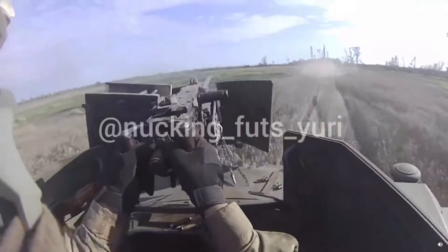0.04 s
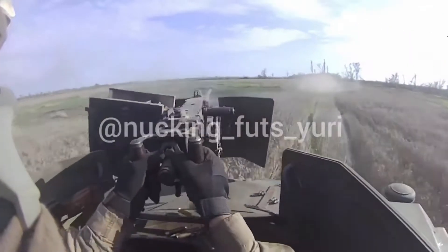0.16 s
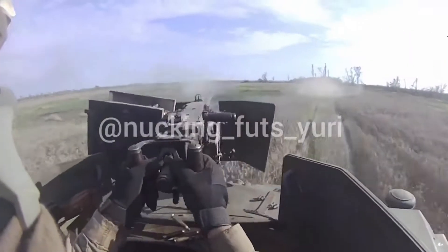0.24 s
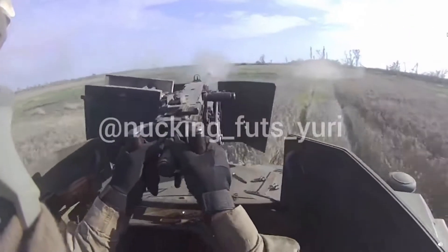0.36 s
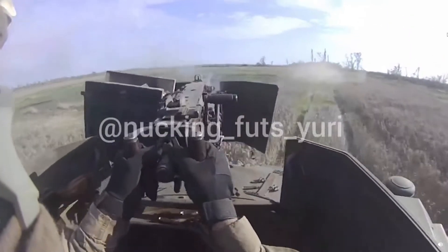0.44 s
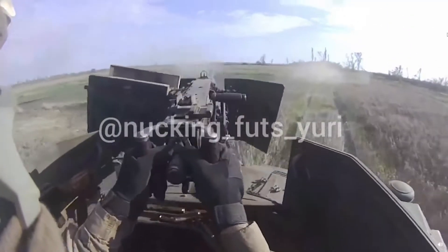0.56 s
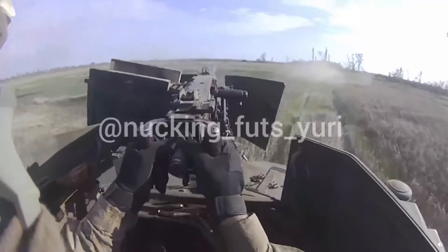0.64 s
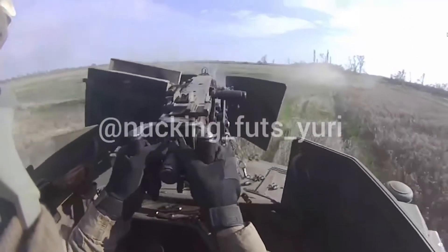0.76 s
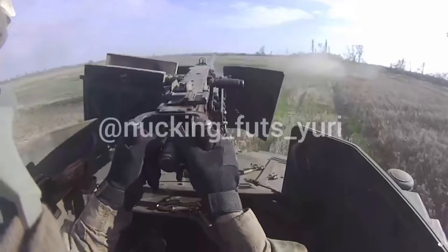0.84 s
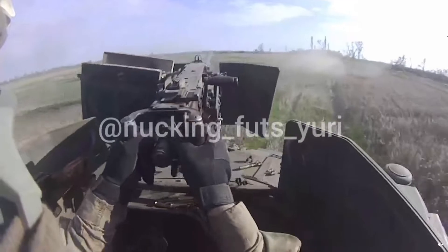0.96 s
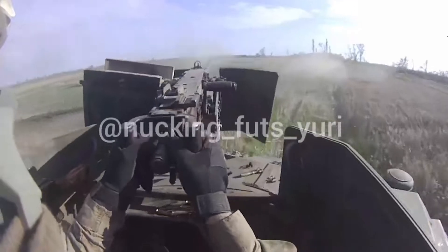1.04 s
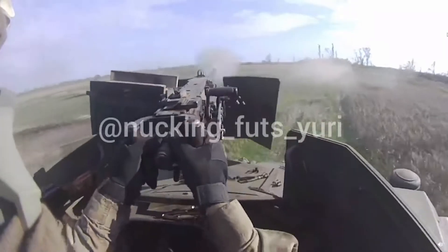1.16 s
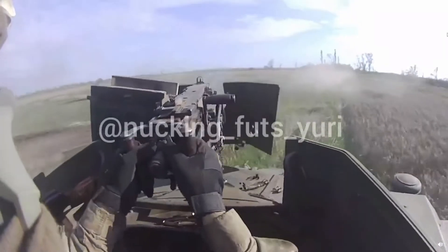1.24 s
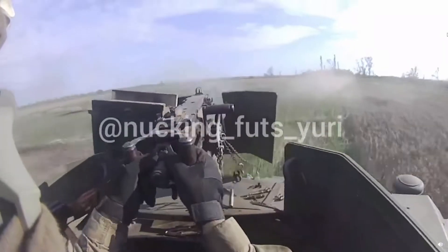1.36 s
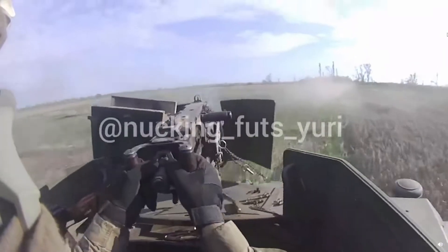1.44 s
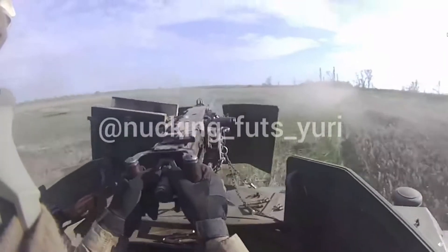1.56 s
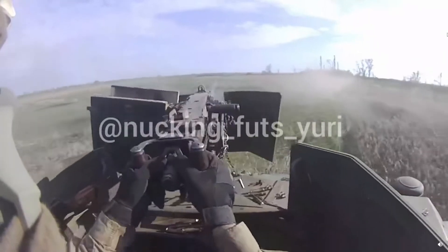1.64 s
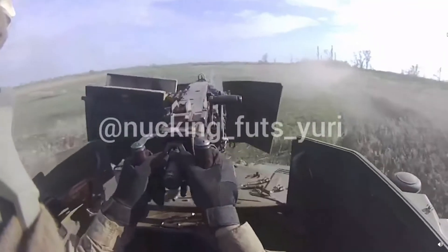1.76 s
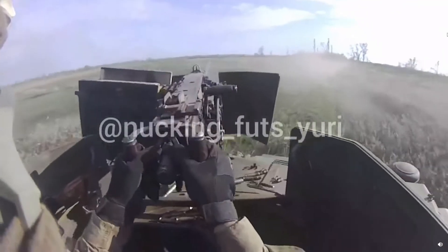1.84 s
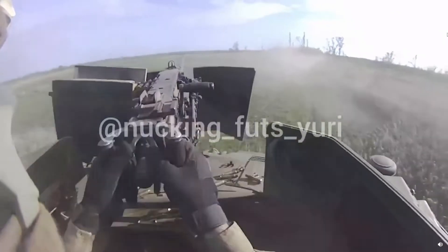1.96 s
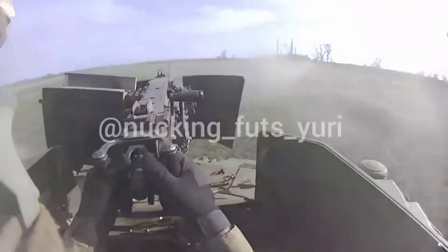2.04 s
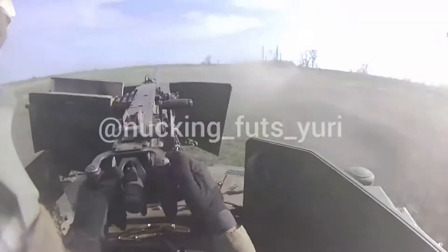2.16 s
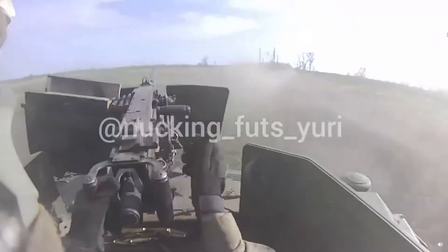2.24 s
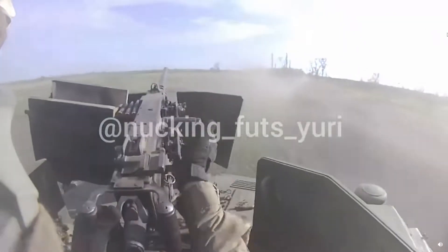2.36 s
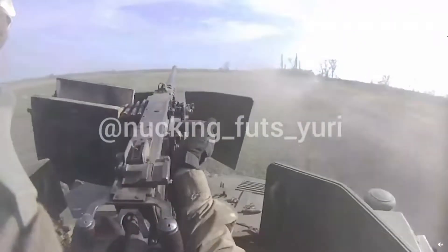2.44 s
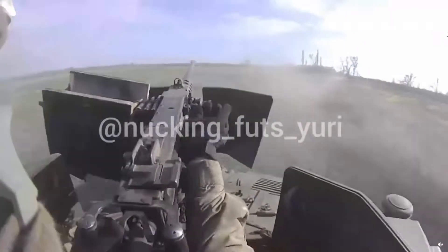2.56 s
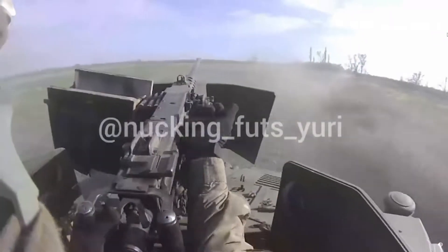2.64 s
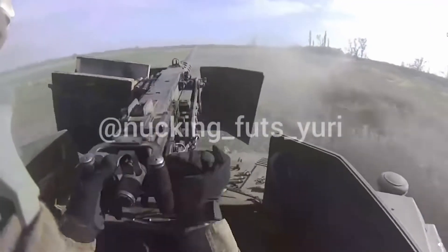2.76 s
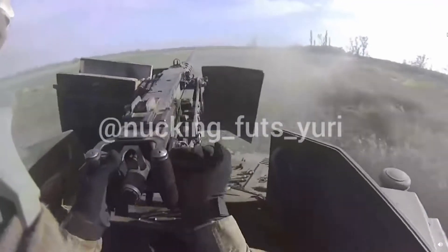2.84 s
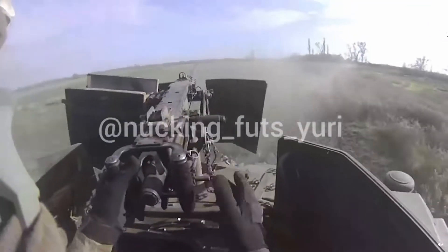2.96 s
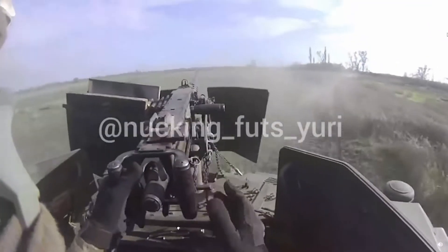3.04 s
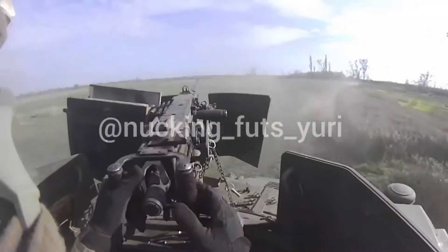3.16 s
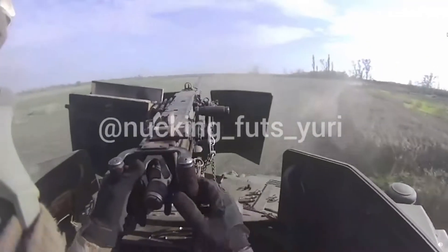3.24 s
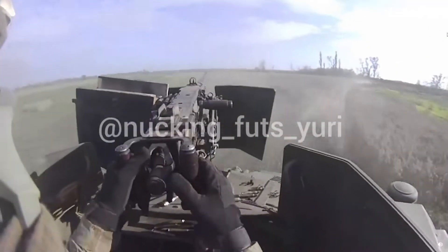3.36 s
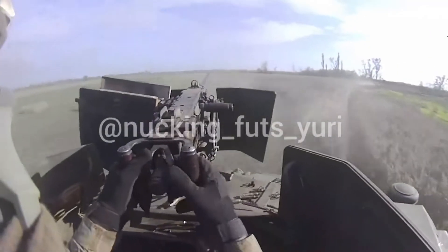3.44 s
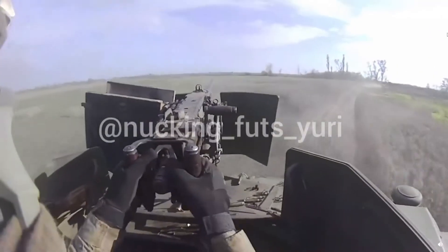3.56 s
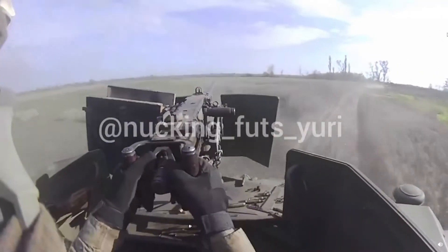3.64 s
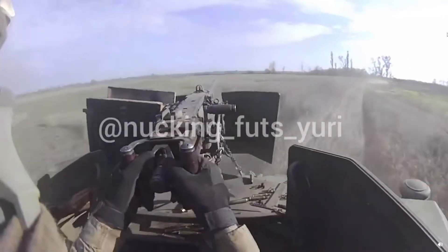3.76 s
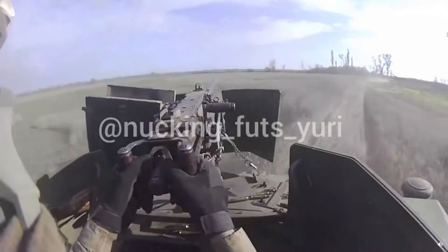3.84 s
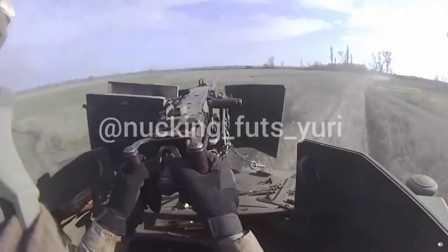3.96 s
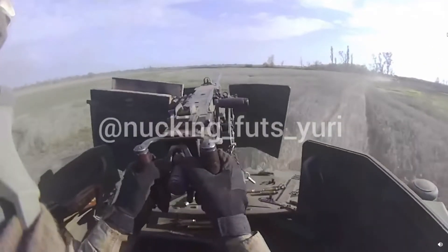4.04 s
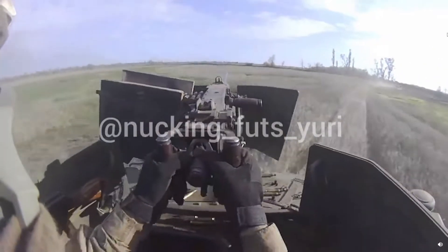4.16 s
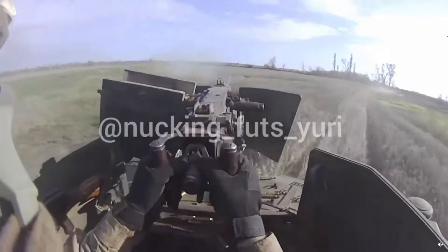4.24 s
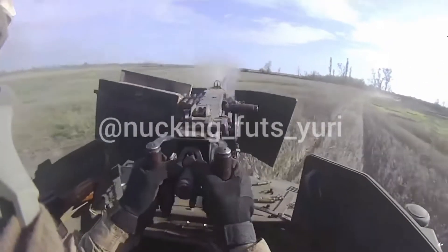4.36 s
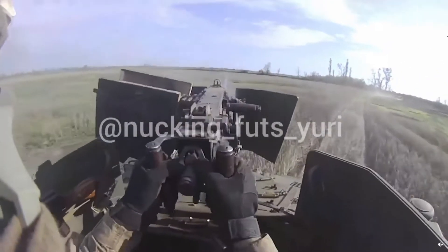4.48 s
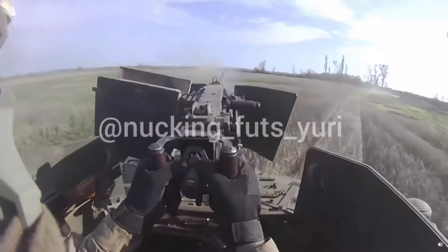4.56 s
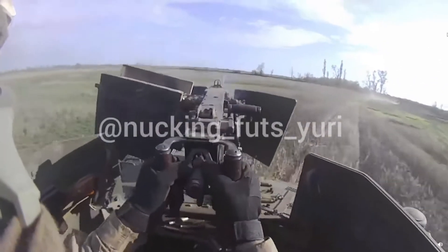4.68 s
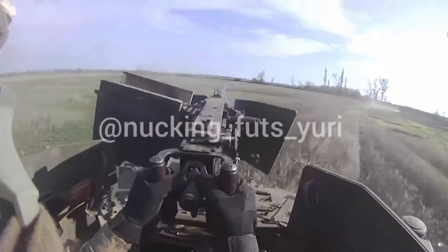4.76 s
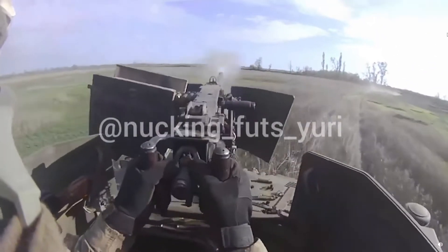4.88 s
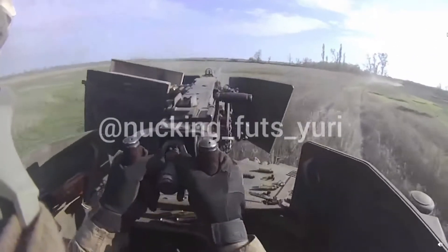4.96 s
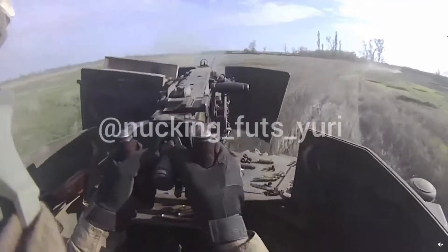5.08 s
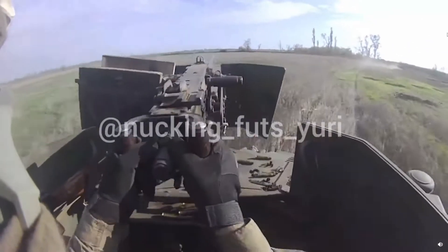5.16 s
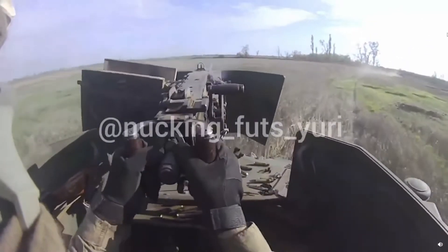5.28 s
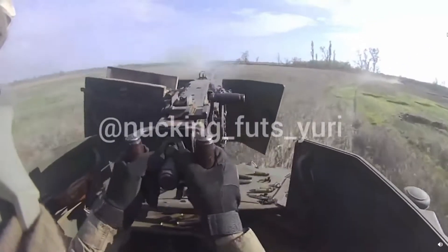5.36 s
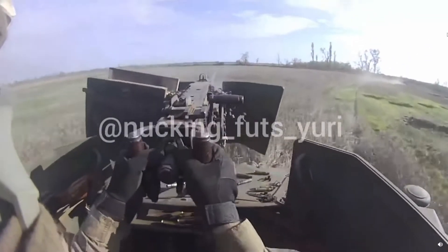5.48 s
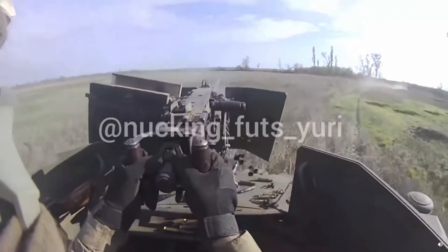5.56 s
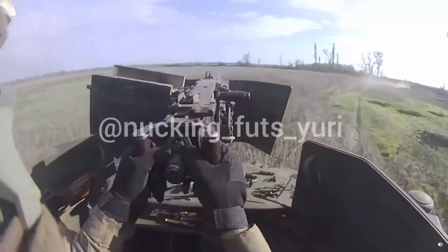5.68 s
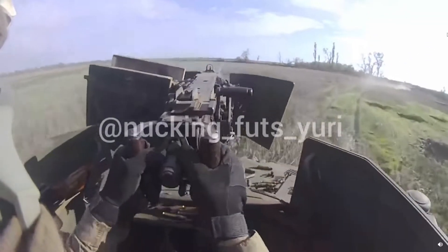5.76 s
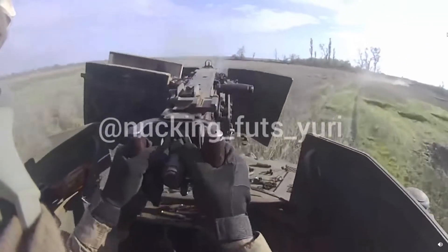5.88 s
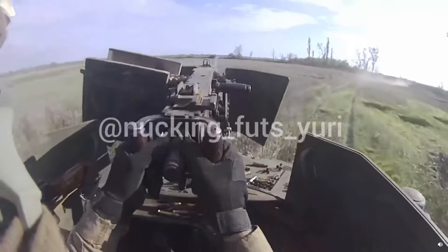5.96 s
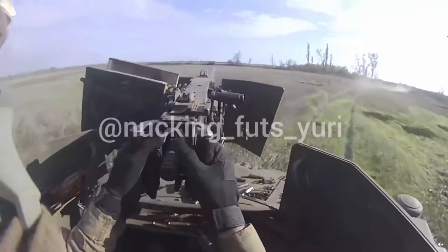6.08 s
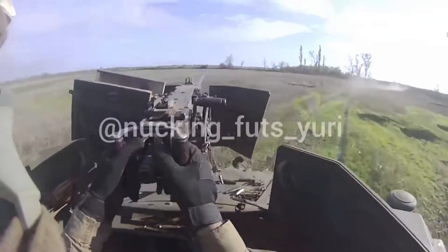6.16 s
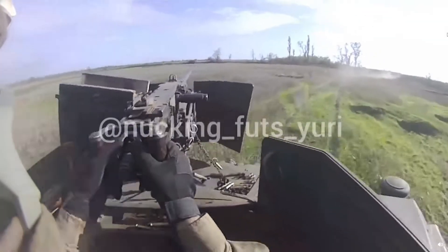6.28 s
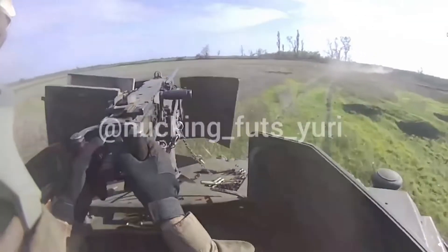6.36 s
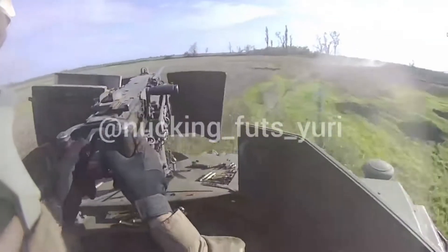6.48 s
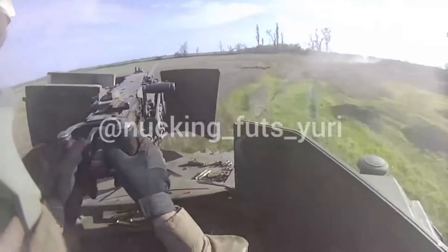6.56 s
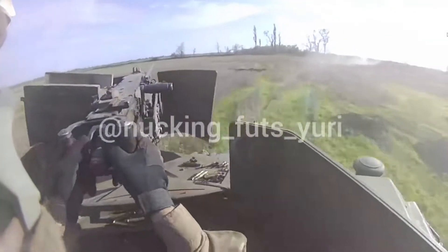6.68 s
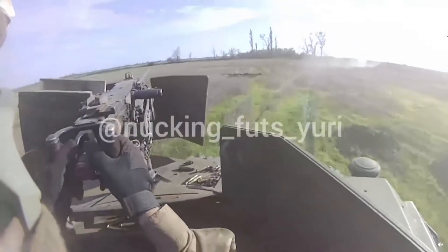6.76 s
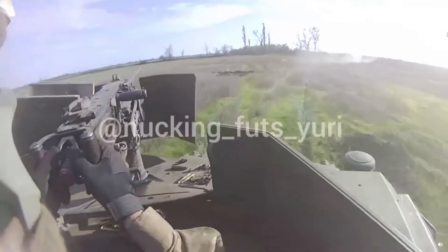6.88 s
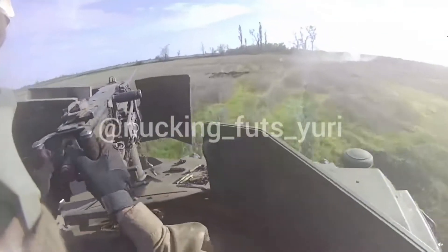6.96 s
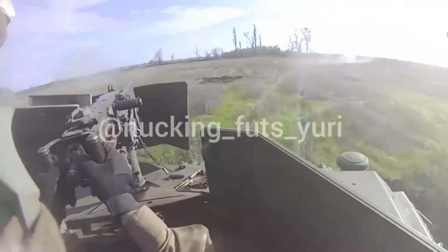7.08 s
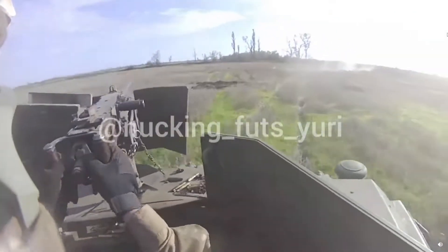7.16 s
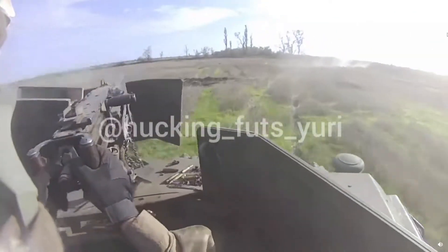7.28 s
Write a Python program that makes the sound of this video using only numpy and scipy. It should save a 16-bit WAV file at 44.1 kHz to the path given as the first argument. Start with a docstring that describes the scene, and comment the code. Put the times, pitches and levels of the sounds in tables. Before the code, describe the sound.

A heavy machine gun fires three rapid bursts up close, with metal links and cases clinking over a faint vehicle rumble.

```python
"""Machine gun on a moving vehicle

A heavy machine gun fires three bursts across an open field, heard from just behind the grips.
Each muzzle blast, a pressure step, rings briefly between the gun shields and scatters over the ground.
Recoil shakes the belt; links and spent cases fall and ring. The gunner handles the action in the
first pause. Wind and running gear rumble faintly underneath."""
import sys
import numpy as np
from scipy import signal
from scipy.fft import rfft, irfft, next_fast_len
from scipy.io import wavfile

SR = 44100
rng = np.random.default_rng(int(sys.argv[2]) if len(sys.argv) > 2 else 0)


def transcribe(signal):
    """Save signal, clipped to [-1, 1], as a 16-bit WAV file at the path in sys.argv[1]."""
    frames = np.atleast_2d(signal).T
    limited = np.clip(frames, -1, 1)
    pcm = np.round(limited * 32767).astype(np.int16)
    wavfile.write(sys.argv[1], SR, pcm)


N = 322371
TIME = np.arange(N) / SR

# shots: (time [s], resonance between the shields [Hz], relative blast [dB], relative crack [dB])
SHOTS = [(0.0188, 800, -1.5, -5), (0.1846, 810, -0.8, -7), (0.3342, 751, -0.2, -4.5), (0.4974, 793, 1, -5),
         (0.6566, 787, 0, -3.5), (0.8224, 790, -0.4, -7.5), (3.5259, 778, 0.3, -5), (3.6884, 770, -0.2, -6),
         (3.876, 780, 0.5, -6), (4.0268, 780, 0.1, -4.5), (4.198, 798, -1.3, -4), (4.3592, 817, 0.3, -6.5),
         (4.514, 825, -0.5, -3.5), (4.677, 774, -1.3, -4), (4.8535, 786, -1.5, -3),
         (5.0169, 776, -0.1, -4.5), (5.1733, 773, -0.6, -5), (6.3661, 793, 0, -7), (6.5274, 826, 0.3, -9),
         (6.719, 790, 0.5, -9), (6.8648, 786, 0.7, -5.5), (7.0075, 810, 0, -6.5), (7.1697, 877, 1.8, -3.5)]
# modes of the turret's air and plates: (frequency [Hz], relative level [dB], t60 [s])
TURRET_MODES = [(165, -41.5, 0.091), (284, -33, 0.083), (470, -41, .03), (530.2, -22, 0.045),
                (913, -35.5, 0.057), (1300, -49.5, 0.01), (1620, -49, 0.017), (1656, -34.5, 0.039),
                (2070, -41.5, 0.044), (2417, -30.5, 0.03)]
# belt links that drop hard or late: (time [s], relative level [dB])
STRAY_LINKS = [(0.985, -57.5), (2.125, -56), (2.523, -47.5), (3.221, -54), (4.115, -43.5)]
# spent cases tumbling across the roof: (time [s], relative level [dB])
TUMBLING_CASES = [(1.684, -70), (5.582, -55.5), (5.659, -54.5), (5.709, -58.5), (5.79, -64.5)]
# modes of a link and of a case: (frequency [Hz], relative level [dB], t60 [s])
LINK_MODES = [(6250, -17, .1), (6600, -3.5, .22), (6300, 2.5, 0.12), (6660, -13, .16), (7300, -14, .08),
              (8900, -30, .12), (9730, -25, .3)]
CASE_MODES = [(5870, -15.5, 0.69), (6160, -2.5, 0.7), (6600, 9, 0.29), (7170, -10.5, 1), (7865, -2.5, 0.19),
              (8770, -9.5, 0.59), (9700, 1.5, 0.32), (10800, -19, 0.82), (11700, -8, 0.55),
              (12400, -20, 0.62)]
# knocks and slides of the action and belt, and knocks of landing cases: (time [s], level [dB], t60 [s])
CLACKS = [(1.097, -71, .03), (1.157, -68, .03), (1.371, -64, .03), (1.684, -70, 0.3), (2.050, -53.5, 0.048),
          (2.123, -62.5, 0.069), (2.319, -64, .28), (2.347, -58, .1), (2.364, -53, .043),
          (5.290, -68, 0.26), (5.329, -54.5, 0.063), (5.448, -57.5, 0.076)]
# slow course of the vehicle's rumble: (time [s], level [dB])
RUMBLE_LEVELS = [(0.0, -55.5), (0.3, -61), (0.6, -59), (0.95, -60.5), (1.62, -55.5), (1.8, -53.5),
                 (2.0, -55.5), (2.45, -59), (2.72, -57), (2.95, -54.5), (3.45, -59.5), (4.4, -59),
                 (5.12, -54.5), (5.35, -59.5), (5.8, -55.5), (6.13, -59), (6.35, -54), (6.95, -53.5),
                 (7.31, -59.5)]
# noise spectra of the sources: (frequency [Hz], relative spectral density [dB])
BARK_SPECTRUM = [(150, -14), (280, -7), (420, 3.5), (600, 2.5), (800, 2.5), (1100, -2.5), (1600, -3),
                 (1900, -16), (2450, -17), (2800, -11), (4000, -13.5), (5500, -30)]   # midrange of the blast
CRACK_SPECTRUM = [(2500, -41), (4200, -19.5), (4800, -3.5), (5500, -12.5), (6450, 1.5), (7200, -3),
                  (8100, -12), (9200, -10), (10200, -18.5), (12900, -18.5), (13500, -29), (15500, -43.5)]   # treble of the blast
TAIL_SPECTRUM = [(100, -4.5), (300, -2.5), (550, -1), (1100, -3.5), (2000, -10), (4000, -12.5),
                 (5400, -10.5), (6500, -3.5), (7800, -7), (10500, -16.5), (12800, -18.5), (13500, -34)]
BELT_SPECTRUM = [(900, -14), (2400, -6.5), (3600, -8), (5400, -12), (6200, 3), (6470, 7), (6750, -3.5),
                 (7700, -6), (9700, -10.5), (12800, -17)]
ACTION_SPECTRUM = [(800, 6.5), (2000, -5.5), (3100, -1), (3450, 7.5), (3800, -3), (5400, -2), (6300, 9.5),
                   (7700, 1.5), (10000, -6), (12800, -13), (13400, -41)]
RUMBLE_SPECTRUM = [(20, -7), (60, -1.5), (130, -0.5), (320, 2), (600, 1), (1000, -8), (1600, -19.5),
                   (3000, -33), (4500, -36), (5600, -36.5), (6500, -30.5), (7600, -49.5), (12800, -49.5),
                   (13600, -64.5)]
GEAR_SPECTRUM = [(400, -11), (800, 5), (1600, -4), (3000, -15), (4500, -25), (9000, -32.5)]


def turret_boom(ring_db=-13.5, ring_t60=.022, hold_s=.0021, echo_db=-13, echo_s=.0055):
    """Step response: each blast sets the air between the shields and the turret's modes ringing."""
    out, t = np.zeros(N), TIME[:SR // 6]
    mode_hz, mode_db, mode_t60 = np.transpose(TURRET_MODES)
    for start, ring_hz, blast_db, _ in SHOTS:
        envelope = fade(np.maximum(t - hold_s, 0), ring_t60)   # escaping gas briefly sustains the ring
        sound = from_db(ring_db + blast_db) * np.cos(2 * np.pi * ring_hz * t) * envelope
        # gun and head shift between shots, varying the modes; the low ones also vary together
        chance_db, detune = rng.normal(0, [[2], [.012]], (2, len(mode_hz)))
        thump_db = rng.normal(-4, .2)
        gains = from_db(blast_db + mode_db + np.where(mode_hz < ring_hz, thump_db, 2.5) + chance_db)
        for hz, gain, t60 in zip(mode_hz * (1 + detune), gains, mode_t60):
            swing = np.cos if hz < 1000 else np.sin   # low modes start at a crest, high ones from rest
            sound += gain * swing(2 * np.pi * hz * t) * fade(t, t60)
        add(out, start, sound)
        # reflection from the rear armour, over a varying path
        add(out, start + echo_s * rng.uniform(.6, 1.5), from_db(echo_db) * sound)
    diffracted = butterworth(out, 1800, "low", order=1)   # bending around the shields rounds the step
    return butterworth(diffracted, 131, "high")


def muzzle_blast(bark_db=-17, bark_t60=.039, rise_s=.0018, echoes_db=-23.5, echoes_t60=.055):
    """A shock front and its scattered echoes, returned as a midrange bark and a treble crack."""
    bark_level, crack_level, t = np.zeros(N), np.zeros(N), TIME[:SR // 6]
    front = from_db(-21) * fade(np.maximum(t - .0034, 0), t60=.014)   # holds briefly, then decays
    for start, ring_hz, blast_db, crack_db in SHOTS:
        add(bark_level, start, from_db(bark_db + blast_db) * fade(t, bark_t60) * rise(t, rise_s))
        flutter = 1 + .25 * np.cos(2 * np.pi * ring_hz * t)   # one pulse per round trip between shields
        echoes = from_db(echoes_db) * flutter * fade(t, echoes_t60)
        add(crack_level, start, from_db(crack_db) * (front + echoes))
    bark = butterworth(bark_level * noise(BARK_SPECTRUM), 131, "high")
    crack = butterworth(crack_level * noise(CRACK_SPECTRUM), 1500, "high")
    return bark, crack


def ground_tail(level_db=-40, t60=.16, rise_s=.012):
    """Scattering from ground and hull leaves a short, faint tail after each shot."""
    envelope, t = np.zeros(N), TIME[:SR // 2]
    for start, *_ in SHOTS:
        add(envelope, start, fade(t, t60) * rise(t, rise_s))
    return from_db(level_db) * envelope * noise(TAIL_SPECTRUM)


def ejected(fall_s, db):
    """One part lands after each shot, delayed by its fall: (time [s], relative level [dB])."""
    chance = rng.uniform([.75, -5], [1.25, 5], (len(SHOTS), 2))
    return [(start + fall_s * stretch, db + chance_db)
            for (start, *_), (stretch, chance_db) in zip(SHOTS, chance)]


def clinks(landings, modes, gain_db, bounce_db, bounce_s, rise_s):
    """Free vibration: a small metal part rings in its damped modes on landing and on one bounce."""
    out, t = np.zeros(N), TIME[:SR // 2]
    mode_hz, mode_db, mode_t60 = np.transpose(modes)
    release = rise(t, rise_s)   # the ring frees itself as the part rolls off the contact
    for start, db in landings:
        part_hz = mode_hz * rng.normal(1, .004, len(modes))
        bounce_delay = bounce_s * rng.uniform(.5, .67)
        for delay, touch_db in ((0, 0), (bounce_delay, bounce_db)):
            gains = from_db(db + gain_db + touch_db + mode_db + rng.normal(0, 2, len(modes)))
            ring = sum(gain * np.sin(2 * np.pi * hz * t) * fade(t, t60)
                       for hz, gain, t60 in zip(part_hz, gains, mode_t60))
            add(out, min(start + delay, TIME[-1]), ring * release)
    return out


def belt_jingle(rest_db=-86, kick_db=-62.5, kick_t60=1):
    """Superposed recoil kicks shake belt and mount: the jingle builds in a burst and decays after it."""
    shake = np.full(N, from_db(rest_db))
    for start, *_ in SHOTS:
        add(shake, start, from_db(kick_db) * fade(TIME, kick_t60))
    return shake * chatter(per_s=680, t60=.072) * noise(BELT_SPECTRUM)


def gun_action(ticks_per_s=4, tick_db=-74.5, tick_t60=.049):
    """Impact and friction of steel parts make gritty knocks and slides, with faint stray ticks."""
    envelope, t = np.zeros(N), TIME[:SR // 3]
    for start, db, t60 in CLACKS:
        add(envelope, start, from_db(db) * fade(t, t60))
    ticks = (rng.random(N) < ticks_per_s / SR) * from_db(rng.normal(tick_db, 2, N))
    envelope += signal.fftconvolve(ticks, fade(t, tick_t60))[:N]
    grit = from_db(-2 * drift(per_s=400))
    return envelope * grit * noise(ACTION_SPECTRUM)


def vehicle_rumble(gear_db=-10, jolt_db=2.3):
    """Jolts modulate the amplitude of wind and wheel noise and of the running gear's rattle."""
    lumps = from_db(1.8 * drift(per_s=60))
    grit = chatter(per_s=650, t60=.022)
    rumble = lumps * noise(RUMBLE_SPECTRUM)
    rattle = from_db(gear_db) * grit * noise(GEAR_SPECTRUM)
    level_db = np.interp(TIME, *np.transpose(RUMBLE_LEVELS)) + jolt_db * drift(per_s=14)
    return from_db(level_db) * (rumble + rattle)


def chatter(per_s, t60):
    """Envelope of a Poisson stream of uneven, quickly decaying contacts; rms 1."""
    contacts = (rng.random(N) < per_s / SR) * np.minimum(rng.exponential(1, N), 3)
    return rms_one(signal.fftconvolve(contacts, fade(TIME[:SR // 8], t60))[:N])


def noise(spectrum):
    """White noise filtered to a spectrum, falling 12 dB an octave beyond its ends; rms 1."""
    hz, db = np.transpose(spectrum)
    size = next_fast_len(N)
    bin_hz = np.maximum(np.arange(size // 2 + 1) * SR / size, 1)
    gain = from_db(np.interp(np.log(bin_hz), np.log(hz), db))
    skirts = np.minimum(bin_hz / hz[0], 1) ** 2 * np.minimum(hz[-1] / bin_hz, 1) ** 2
    white = rfft(rng.standard_normal(N), size)
    return rms_one(irfft(white * gain * skirts, size)[:N])


def drift(per_s):
    """Linear interpolation between Gaussian random values; spread near 1."""
    return np.interp(TIME * per_s, np.arange(4096), rng.standard_normal(4096))


def fade(t, t60):
    """Exponential decay that loses 60 dB in t60 seconds."""
    return np.exp(-np.log(1000) * t / t60)


def rise(t, rise_s):
    """Exponential approach to 1 with time constant rise_s."""
    return 1 - np.exp(-t / rise_s)


def butterworth(x, hz, kind, order=2):
    """Maximally flat low-pass or high-pass filter."""
    return signal.sosfilt(signal.butter(order, hz, kind, fs=SR, output="sos"), x)


def from_db(db):
    """Decibels to amplitude ratio."""
    return 10 ** (np.asarray(db) / 20)


def rms_one(x):
    """Normalise to an rms of 1."""
    return x / np.sqrt(np.mean(x ** 2) + 1e-20)


def add(out, start_s, sound):
    """Superpose a sound on out from start_s onward."""
    i = round(start_s * SR)
    out[i:i + len(sound)] += sound[:N - i]


def scene(width_db=-13):
    """The sources superpose straight ahead; only the crack carries a faint, partly independent side component."""
    bark, crack = muzzle_blast()
    _, side_crack = muzzle_blast()
    links = clinks(ejected(fall_s=.085, db=-51.5) + STRAY_LINKS, LINK_MODES,
                   gain_db=-9.5, bounce_db=-4, bounce_s=.044, rise_s=.001)
    cases = clinks(ejected(fall_s=.56, db=-69) + TUMBLING_CASES, CASE_MODES,
                   gain_db=-7.5, bounce_db=-7.5, bounce_s=.028, rise_s=.0006)
    gunfire = turret_boom() + bark + crack + ground_tail()
    mid = gunfire + links + cases + gun_action() + belt_jingle() + vehicle_rumble()
    side = from_db(width_db) * butterworth(side_crack, 1200, "high", order=4)
    return np.array([mid + side, mid - side])


def record(dry, ceiling=.6, shelf_hz=13100, shelf_db=-22, stopband_hz=15900):
    """Saturation in the microphone rounds the peaks; the treble steps down and is then cut off."""
    rounded = ceiling * np.tanh(dry / ceiling)
    below = butterworth(rounded, shelf_hz, "low", order=20)
    above = from_db(shelf_db) * butterworth(rounded, shelf_hz, "high", order=8)
    return signal.sosfilt(signal.cheby2(12, 60, stopband_hz, fs=SR, output="sos"), below + above)


dry = scene()
out = record(dry)
transcribe(out)
```